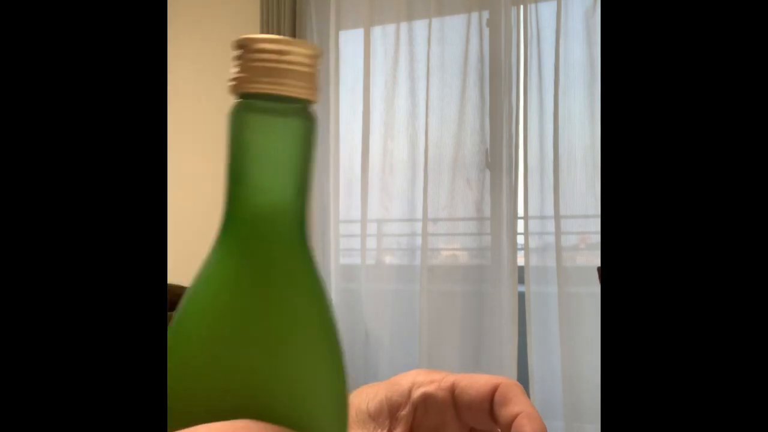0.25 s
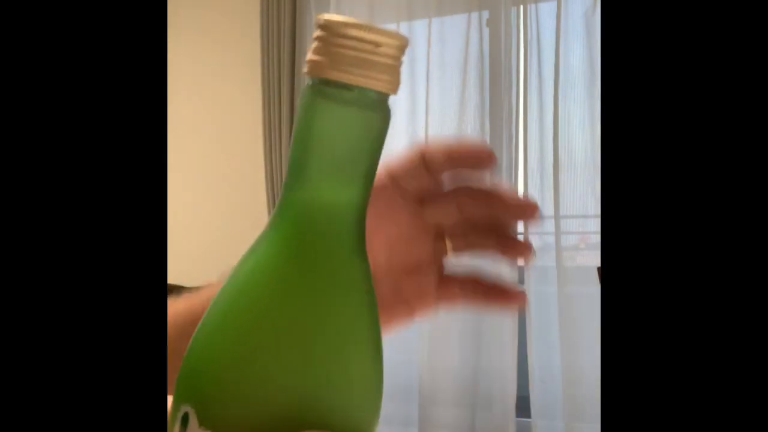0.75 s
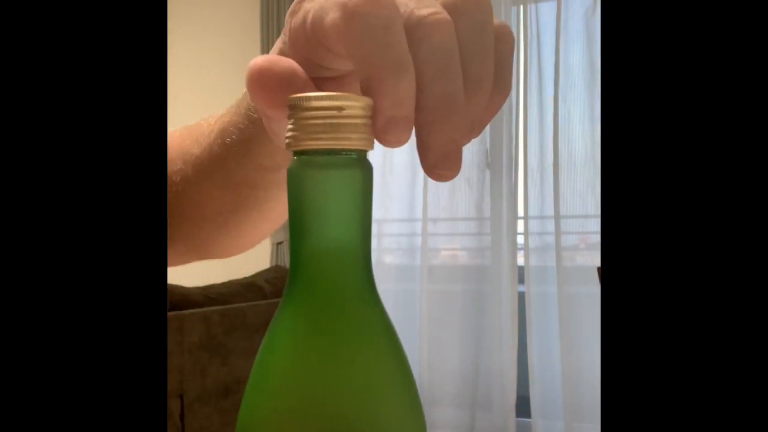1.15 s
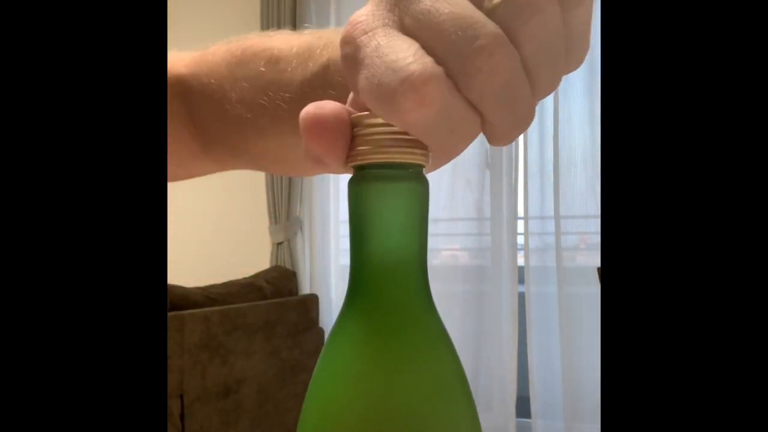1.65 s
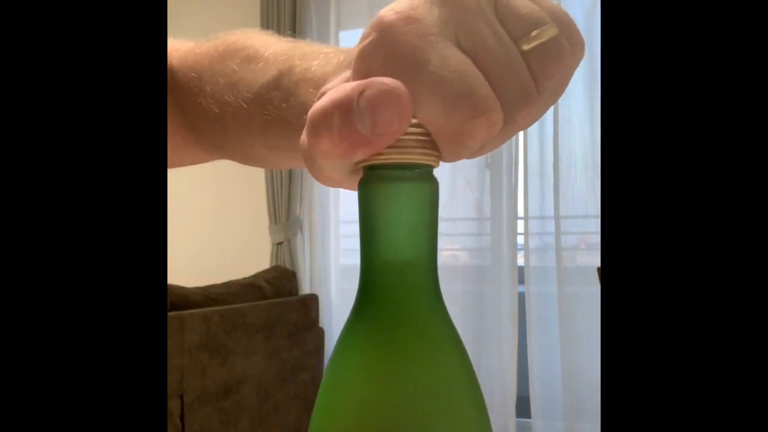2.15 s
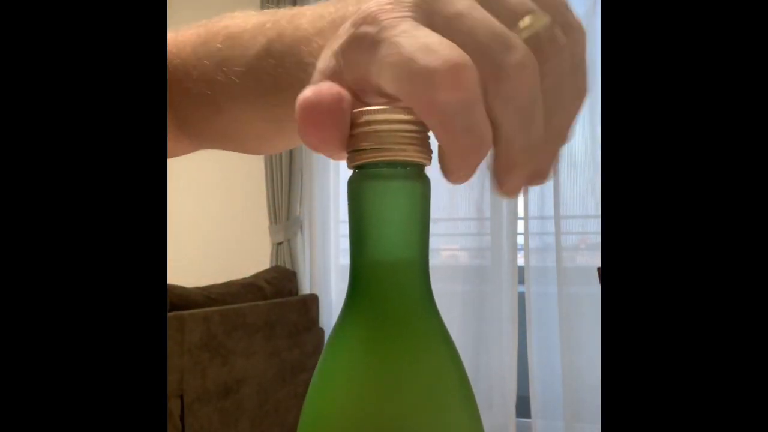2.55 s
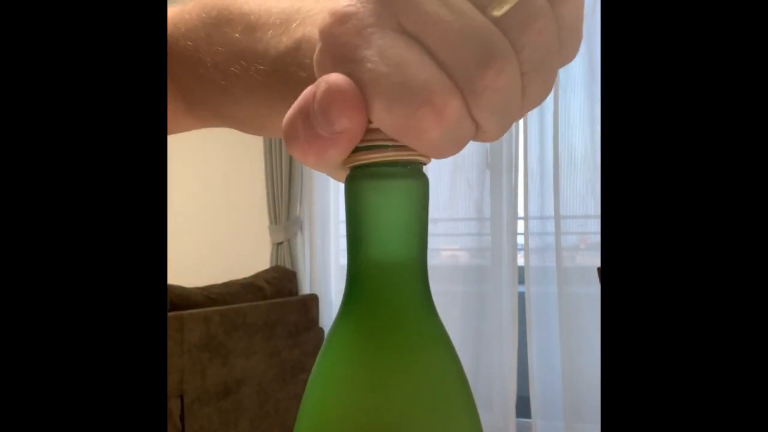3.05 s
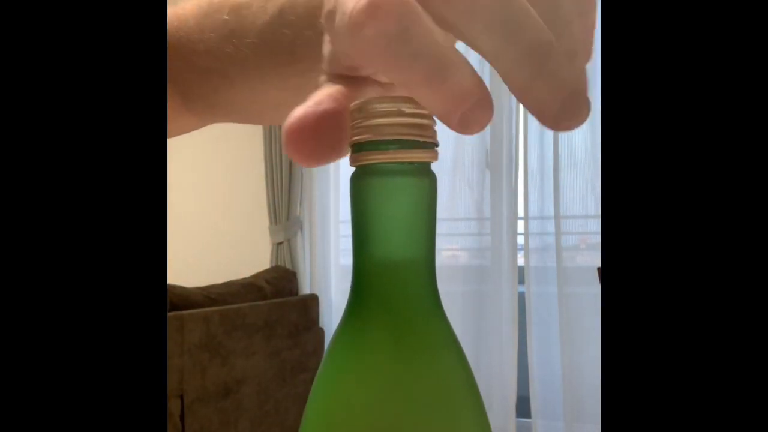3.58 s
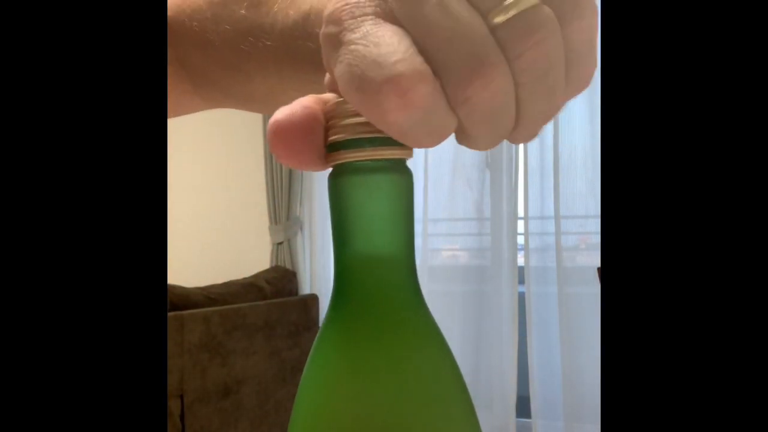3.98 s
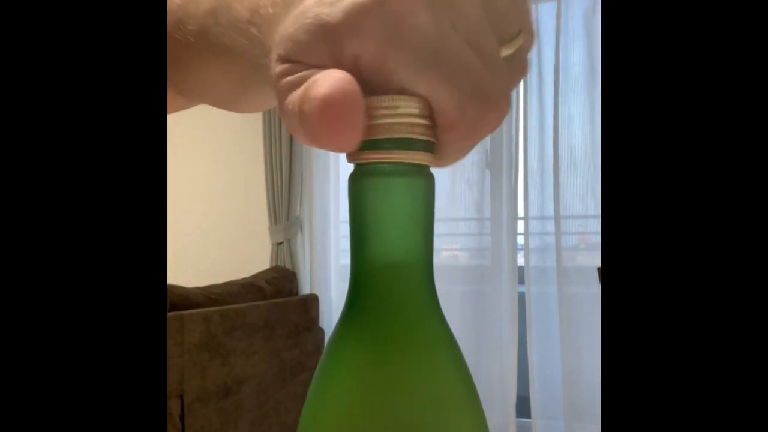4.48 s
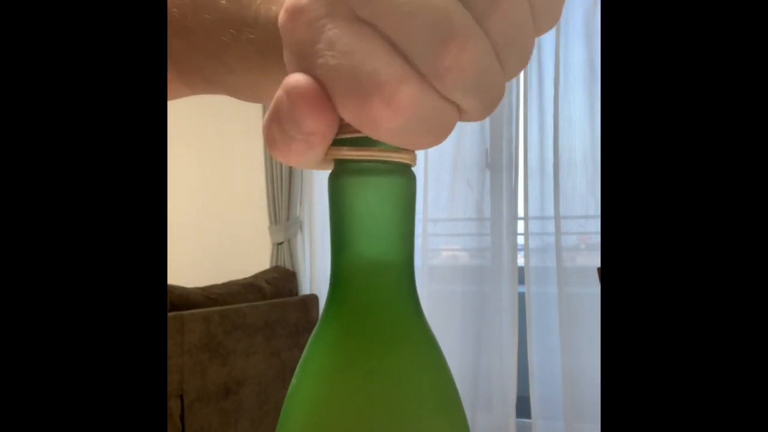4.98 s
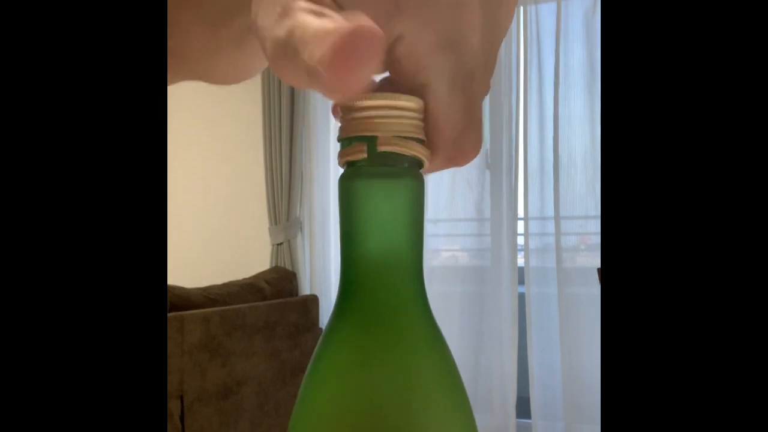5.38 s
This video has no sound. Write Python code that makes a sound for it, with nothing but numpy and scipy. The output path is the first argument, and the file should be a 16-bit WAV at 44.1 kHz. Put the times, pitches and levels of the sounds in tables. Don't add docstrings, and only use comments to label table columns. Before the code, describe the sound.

Close indoor bottle opening: bottle knocks on a table, cap seal cracks in bursts, threads rub and squeak, then the freed cap pings.

```python
import sys
import numpy as np
from scipy import signal
from scipy.fft import rfft, irfft, next_fast_len
from scipy.io import wavfile
from scipy.ndimage import uniform_filter1d

SR = 44100
rng = np.random.default_rng(int(sys.argv[2]) if len(sys.argv) > 2 else 0)


def decibels_to_gain(level_db):
    exponent = np.asarray(level_db, float) / 20
    return 10 ** exponent


def to_wav(s):
    ch = np.atleast_2d(s).T
    pcm = np.round(np.clip(ch, -1, 1) * 32767)
    wavfile.write(sys.argv[1], SR, pcm.astype(np.int16))


N = 247842
SIZE = next_fast_len(N)


def shape(x, points):
    hz, db = np.transpose(points)
    size = next_fast_len(x.shape[-1])
    f = np.fft.rfftfreq(size, 1 / SR) + 1
    gain = decibels_to_gain(np.interp(np.log(f), np.log(hz), db))
    return irfft(rfft(x, size) * gain, size)[..., :x.shape[-1]]


def bandpass(x, hz, width_hz):
    return signal.lfilter(*signal.iirpeak(min(hz, .4 * SR), hz / width_hz, fs=SR), x)


def log_interp(hz, points):
    point_hz, value = np.transpose(points)
    return np.interp(np.log(hz), np.log(point_hz), value)


def unit(x):
    return x / np.abs(x).max()


def add(out, s, x):
    i = int(s * SR)
    out[..., i:i + x.shape[-1]] += x[..., :N - i]


def walk(rate_hz):
    k = int(SR / rate_hz)
    steps = np.repeat(rng.standard_normal(N // k + 1), k)
    return 1.83 * uniform_filter1d(uniform_filter1d(steps, k), k)[:N]


# f/Hz, level/(dB per Hz)
AIR_HUM = [(13, -41.5), (22, -4.5), (53, -3.5), (82, -14.5), (204, -20), (233, -32), (306, -17.5),
           (393, -22), (505, -22.5), (605, -29.5), (975, -28), (1090, -34), (1680, -37), (2620, -42),
           (3000, -52), (6500, -74), (11000, -120)]


def air(hum_db=-50, linger_db=-41.5, linger_s=0.28, left_db=1.0, hiss_db=-81):
    noise = rng.standard_normal((5, N))
    low = shape(noise[0], [(80, -3.5), (130, -29.5)]) * decibels_to_gain(2.0 * walk(3.85))
    rest = shape(noise[1:3], [(70, -8), (120, 0)]) * decibels_to_gain(.8 * walk(8))
    hum = shape(low + rest, AIR_HUM)
    t = np.arange(N) / SR
    linger = 0
    for s, db, *_ in KNOCKS:
        linger = linger + decibels_to_gain(2 * (db + linger_db)) * (t > s) * np.exp(-np.abs(t - s) / linger_s)
    hum = hum / hum.std() * np.sqrt(decibels_to_gain(2 * hum_db) + linger)
    tilt = decibels_to_gain(np.array([[left_db], [-left_db]])) - 1
    hum += shape(hum, [(700, 7), (1500, -3)]) * tilt
    hiss_colour = [(1500, -6), (2600, 11.5), (3100, -7.5), (6000, 3), (11000, 0.5), (16000, -12.5)]
    return hum + decibels_to_gain(hiss_db) * shape(noise[3:], hiss_colour)


# f/Hz, t60/s
ROOM_DECAY = [(60, 0.61), (300, 0.44), (1500, 0.48), (4500, 0.38), (9000, 0.3), (16000, 0.27)]


def room(x, wet_db, first_s=0.0043):
    t = np.arange(SR // 2) / SR
    tail = 0
    for hz in 45 * 2 ** np.arange(0, 8.6, .5):
        band = bandpass(rng.standard_normal((2, len(t))), hz, hz / 3)
        tail = tail + band * decibels_to_gain(-60 * t / log_interp(hz, ROOM_DECAY))
    tail *= np.clip(t / first_s - .5, 0, 1)
    tail /= np.sqrt(np.sum(tail ** 2) / 2)
    return signal.fftconvolve(x, tail, axes=1)[:, :N] * decibels_to_gain(wet_db)


# t/s, 250-550 Hz peak level/dB, then relative to it bass/dB, upper body/dB, edge/dB
KNOCKS = [(0.05, -51, 2, -7.5, 0), (0.336, -16.5, -13.5, 0, -9), (0.463, -28, -6.5, 13, -1.5),
          (1.195, -5.5, -3, -3, -5), (1.411, -16.5, -6.5, -6.5, -4.5), (1.42, -5, -5.5, -1, -4),
          (1.504, -27.5, -15.5, 6.5, -1), (1.661, -22, -6.5, -8.5, -14.5), (1.805, -29.5, -8, -5, -13.5),
          (2.102, -20.5, -28.5, -6, -8), (2.215, -25, -2, -5.5, -19), (2.391, -28.5, -11.5, -11.5, -19),
          (2.709, -15.5, -13.5, -6.5, -12.5), (2.876, -21, -8.5, -7, -16), (3.004, -26, 0.5, -1, -3),
          (3.167, -23, -7.5, -4, -5.5), (3.802, -28, -5, -5.5, -11.5), (4.132, -25.5, -3.5, -7, -8.5),
          (4.302, -14, -6.5, 0, -9), (4.476, -32, -2, -23, -15.5), (4.855, -19.5, -6.5, -7, -15),
          (5.133, -19.5, 1.5, -10, -6.5), (5.278, -11.5, -9.5, -2.5, -8.5), (5.363, -8, -8, 0, 0)]
# t/s, first level/dB, change/(dB per bounce), bounces
CHATTERS = [
    (.53, -29.5, -1.77, 8),
    (.542, -28, -2, 1),
    (1.214, -17, -6.5, 2),
    (2.125, -34, 0.36, 8),
    (2.146, -34.5, 1, 1),
    (5.286, -19, 0, 1.028),
    (5.372, -10.5, -6, 1.8),
]
# bass/dB, upper body/dB, edge/dB
BOUNCE_COLOUR_DB = [-18.5, 0, -8]


def jolts(bounce_s=.0135, jitter=.2, scatter_db=5.5):
    rows = list(KNOCKS)
    for s, first_db, step_db, count in CHATTERS:
        k = np.arange(int(count))
        time_chance, level_chance = rng.standard_normal((int(count), 2)).T
        at = s + bounce_s * (k + jitter * time_chance * (k > 0))
        db = first_db + step_db * k + scatter_db * level_chance
        rows += [(a, d, *BOUNCE_COLOUR_DB) for a, d in zip(at, db)]
    return rows


# f/Hz, level/dB
EDGE_COLOUR = [(800, -20), (1290, 9), (1600, -2.5), (2300, -4), (3200, -13), (5000, -20.5), (8000, -28),
               (16000, -51.5)]


def knock_edge(t, peak_db, rise_s=.003, fade_s=0.0092, lag_s=0.00024, own=0.98, click_slope=0.45):
    shake = rng.standard_normal((3, len(t)))
    shared = np.array([shake[0], np.roll(shake[0], int(lag_s * SR))])
    edge = shape(shared + own * shake[1:], EDGE_COLOUR)
    edge = edge * (1 - np.exp(-(t / rise_s) ** 2)) * np.exp(-t / fade_s)
    dull = shape(edge, [(2500, 0.5), (5000, -15.0)])
    click = (edge - dull) * np.exp(-(t / 0.0078) ** 2)
    return unit(dull + decibels_to_gain(click_slope * peak_db) * click)


# f/Hz, level/dB, t60/s
WOOD_MODES = [(52, -29, 0.037), (79.3, -10.5, 0.13), (110.8, 3, 0.062), (151.4, -3.5, 0.093),
              (187.4, 0.5, 0.048), (225.3, -2, 0.063), (275, 0, 0.055), (353.2, -8, 0.092),
              (375.9, 0, 0.087), (402.3, -5.5, 0.085), (445, -6, 0.071), (511.5, 0.5, 0.059),
              (638.7, -3, 0.049), (716.2, 0.5, 0.065), (779.2, -5.5, 0.063), (858.8, -8, 0.079),
              (979, -12.5, 0.067), (1079.6, -10, 0.065)]
WOOD_EDGES_HZ = [250, 550]
# f/Hz, left lead/rad
TABLE_PHASE = [(50, .5), (200, 0.7), (340, 1.8), (780, 0.43), (1030, 2.5)]


def knocks(scatter_db=4.5, late=3.34, spread=0.025, damp_db=5, free_s=0.028, pan_db=2):
    out, t = np.zeros((2, N)), np.arange(SR // 8) / SR
    hz, db, t60 = np.repeat(np.transpose(WOOD_MODES), 2, axis=1)[:, :, None]
    group = np.searchsorted(WOOD_EDGES_HZ, hz[:, 0])
    rise = 1 - np.exp(-(t * np.sqrt(hz * 300) / late) ** 2)
    swell = rise * decibels_to_gain(-60 * t / t60) * (1 - t / t[-1])
    swell *= decibels_to_gain(-damp_db * np.clip((t - free_s) / 0.012, 0, 1))
    apart = log_interp(hz, TABLE_PHASE) / (2 * np.pi) * [[[1]], [[0]]]
    pan = np.array([[pan_db], [-pan_db]]) / 2
    for s, peak_db, bass_db, upper_db, edge_db in jolts():
        detune = 1 + spread * rng.standard_normal((len(hz), 1))
        size = decibels_to_gain(db + scatter_db * rng.standard_normal((len(hz), 1)))
        phase = rng.random((len(hz), 1)) + apart + 0.072 * rng.standard_normal((2, len(hz), 1))
        modes = size * swell * np.sin(2 * np.pi * (hz * detune * t + phase))
        body = decibels_to_gain(edge_db) * knock_edge(t, peak_db)
        for k, group_db in enumerate([bass_db, 0, upper_db]):
            body += decibels_to_gain(group_db) * unit(modes[:, group == k].sum(1))
        add(out, s - .0042, body * decibels_to_gain(peak_db + pan))
    return out


# t/s, level/dB, treble share/dB, lowest mode share/dB
TICKS = [
    (1.505, -44, -11, -9),
    (2.097, -60, 11, 14),
    (2.135, -62, -1, 8),
    (2.159, -62, -10, 12),
]
# f/Hz, level/dB, t60/s
RING_MODES = [(3610, 0, .055), (4800, -24, .08), (5500, 0, .2), (8350, -14, .07), (13620, -9, .15),
              (14830, -23, .15)]


def ticks(beat=0.45, split=0.006, scuff_db=3.0):
    out, t = np.zeros(N), np.arange(SR // 3) / SR
    for s, level_db, treble_db, low_db in TICKS:
        for hz, db, t60 in RING_MODES:
            share_db = treble_db * (hz > 8000) + low_db * (hz < 4000)
            fade = decibels_to_gain(level_db + db + share_db - 60 * t / t60)
            beating = 1 + beat * np.sin(2 * np.pi * hz * split * t)
            add(out, s, fade * beating * np.sin(2 * np.pi * hz * t))
        scuff = shape(rng.standard_normal(len(t)), [(2000, -7), (5000, 5.0), (7000, -3), (10000, -29.5)])
        add(out, s, decibels_to_gain(level_db + scuff_db) * scuff * np.exp(-t / 0.015))
    return out


def stroke(swell_s, fade_s, patchy_db=1.5):
    reach = 1.3
    t = np.arange(-int(reach * swell_s * SR), int(reach * fade_s * SR)) / SR
    arc_db = -20 * (t / np.where(t < 0, swell_s, fade_s)) ** 2
    return decibels_to_gain(arc_db + patchy_db * walk(60)[:len(t)]), reach * swell_s


def slips(n, grain_db=1.5):
    return rng.standard_normal(n) * decibels_to_gain(grain_db * rng.exponential(size=n))


# loudest t/s, swell/s, fade/s, level/dB, brightest band f/Hz
SLIDES = [(.27, 0.2, 0.16, -88, 12500), (.72, 0.039, 0.022, -81, 11600), (.96, .1, .1, -84.5, 11400),
          (2.568, .03, 0.043, -96, 14500), (2.824, 0.026, .035, -85.5, 14200),
          (3.445, 0.029, 0.046, -69, 14700), (4.05, .05, 0.12, -75.5, 14100),
          (4.23, 0.14, 0.097, -68.5, 13600), (4.53, 0.066, 0.099, -67, 14600),
          (4.75, 0.14, .15, -88, 13000), (4.9, 0.012, 0.04, -64.5, 13000), (5.08, 0.09, 0.12, -58.5, 13900)]


def slides(cup_s=0.0015, cup_db=-6, width_hz=2600, wide_db=-7):
    out = np.zeros(N)
    delay = int(cup_s * SR)
    for s, swell_s, fade_s, db, hz in SLIDES:
        size, lead_s = stroke(swell_s, fade_s)
        x = slips(len(size))
        x[delay:] += decibels_to_gain(cup_db) * x[:-delay]
        wide = bandpass(bandpass(x, 8600.0, 5600.0), 9100.0, 6600.0)
        treble = bandpass(bandpass(x, hz, width_hz), hz, width_hz)
        rub = treble / treble.std() + decibels_to_gain(wide_db) * wide / wide.std()
        add(out, s - lead_s, rub * size * decibels_to_gain(db))
    return out


# loudest t/s, swell/s, fade/s, level/dB
SCRAPES = [
    (.22, 0.096, 0.35, -74),
    (.57, 0.086, 0.047, -77),
    (2.19, 0.017, 0.012, -48.5),
    (2.59, .1, .05, -82),
    (2.93, .04, .01, -62),
    (4.2, .16, 0.17, -68.5),
    (4.499, 0.035, 0.084, -70),
    (4.74, 0.24, 0.14, -67),
    (4.902, .015, 0.12, -52.5),
    (5.091, 0.17, 0.15, -61),
]


def scrapes():
    out = np.zeros(N)
    for s, swell_s, fade_s, db in SCRAPES:
        size, lead_s = stroke(swell_s, fade_s)
        lower = bandpass(bandpass(slips(len(size)), 3100.0, 4500.0), 2600.0, 7000.)
        add(out, s - lead_s, lower / lower.std() * size * decibels_to_gain(db))
    return out


# start t/s, length/s, f/Hz, width/Hz, level/dB
SINGS = [(4.16, .13, 10300, 900, -68), (4.16, .13, 6700, 900, -74.5), (4.81, .05, 7600, 400, -73),
         (4.17, .11, 12000, 800, -72), (4.885, .07, 2600, 260, -54), (4.885, .056, 3950, 300, -50),
         (5.02, .09, 9600, 1500, -58), (5.02, .09, 6800, 900, -68), (.88, .18, 11400, 700, -84),
         (5.342, .043, 3500, 430, -43), (5.344, .025, 1200, 620, -37), (1.18, .017, 1200, 1200, -43.5),
         (3.003, .025, 2300, 3000, -43), (3.005, .13, 2330, 300, -55)]
# start t/s, length/s, level/dB
SQUEAKS = [
    (2.47, .13, -74),
    (2.77, .09, -80),
    (3.88, .11, -78),
    (4.53, .09, -69),
]


def sings(liner_hz=4470, liner_width_hz=90):
    out = np.zeros(N)
    squeaks = [(s, length_s, liner_hz, liner_width_hz, db) for s, length_s, db in SQUEAKS]
    for s, length_s, hz, width_hz, db in SINGS + squeaks:
        noise = rng.standard_normal(int(length_s * SR))
        line = bandpass(bandpass(noise, hz, width_hz), hz, 2 * width_hz)
        add(out, s, decibels_to_gain(db) * line / line.std() * np.hanning(len(line)) ** .5)
    return out


# f/Hz, level/dB, t60/s
CAP_MODES = [(3398, -1.5, 0.4), (3440, 5.5, 0.3), (4650, -10, 0.32), (5470, -16, .35), (6740, -14, 0.3)]
# t/s, level/dB
CAP_FREE = (5.366, -36)


def cap_ring():
    out, t = np.zeros(N), np.arange(SR // 3) / SR
    free_s, level_db = CAP_FREE
    for hz, db, t60 in CAP_MODES:
        rough = bandpass(rng.standard_normal(len(t)), hz, 25.)
        add(out, free_s, decibels_to_gain(level_db + db - 60 * t / t60) * rough / rough.std())
    return out


# t/s, level/dB, crack f/Hz, cap ring above the crack/dB, ring f/Hz
SNAPS = [(2.199, -0.5, 13100, -11.5, 3660), (2.206, -9, 12380, -5, 3430), (2.2143, -2.5, 12920, -9, 3770),
         (2.2269, -10, 11900, -1.3, 3807), (2.2488, -3, 12400, -12.5, 4200), (2.5, -53, 10480, 4, 4440),
         (2.9242, -42.5, 8000, 3, 2790), (2.9426, -17, 12400, -24, 3500), (3.0, -0.5, 13640, -30, 4780),
         (3.0046, -10, 11760, -5.5, 4550), (3.1645, -1.5, 10200, -19, 4650),
         (3.308, -46.5, 7940, -0.5, 4480), (5.1258, -4.5, 12400, -13.5, 4150),
         (5.3616, -33.5, 7600, 19.5, 2100), (5.371, -8, 12800, -6, 3220), (5.3725, -5.5, 13100, -23, 3520)]
# f/Hz, level/dB
SPRAY_COLOUR = [(1400, -21.5), (2050, -10), (2300, 4.5), (2600, -10), (4200, -2), (4600, 11.5), (5000, -2),
                (6500, -3), (8500, 7), (16000, 1)]


def snaps(crack_s=0.000084, echo_s=.00045, echo_db=-3, ring_s=0.00089, ring_width_hz=800,
          crack_db=1.5, spray_db=3):
    out, t = np.zeros((2, N)), np.arange(SR // 40) / SR
    steep = [(2500, -26), (6000, -22.5), (7800, 7.5), (22000, -5)]
    wide = decibels_to_gain(spray_db) * shape(1. * (t == t[9]), SPRAY_COLOUR)
    for s, peak_db, crack_hz, ring_db, ring_hz in SNAPS:
        burst = rng.standard_normal(len(t)) * t * np.exp(-t / crack_s)
        crack = unit(shape(bandpass(burst, crack_hz, 7500.0), steep))
        crack = unit(crack + decibels_to_gain(echo_db) * np.roll(crack, int(echo_s * SR)))
        shake = rng.standard_normal(len(t)) * t * np.exp(-t / ring_s)
        octave_below = bandpass(shake, ring_hz / 2, 300.0)
        ring = decibels_to_gain(ring_db) * unit(bandpass(shake, ring_hz, ring_width_hz) + 0.19 * octave_below)
        add(out, s - .00015, decibels_to_gain(peak_db) * np.array([decibels_to_gain(crack_db) * crack + ring, wide + ring]))
    return out


# f/Hz, right lag/rad
PORT_LAG = [(0, 0), (4000, 1.5), (7500, 2.1), (9300, 3.14), (12500, 5.3), (16000, 7.2), (22050, 10)]


def lag(x):
    turn = np.interp(np.fft.rfftfreq(SIZE, 1 / SR), *np.transpose(PORT_LAG))
    return np.array([x, irfft(rfft(x, SIZE) * np.exp(-1j * turn), SIZE)[:N]])


def scene():
    table, (crack, spread) = knocks(), snaps()
    hand = lag(ticks() + slides() + scrapes() + sings() + cap_ring())
    wall_colour = [(70, -14), (350, 2), (730, -4.5), (1400, -1.0), (5000, -1.5), (9000, -9.5)]
    to_walls = decibels_to_gain(-8.5) * shape(table, wall_colour) + decibels_to_gain(-8.5) * spread + decibels_to_gain(-9.5) * hand
    return table + lag(crack) + hand + room(to_walls, 0) + air()


def top_cut(x):
    return signal.sosfilt(signal.butter(12, 17840, fs=SR, output="sos"), x)


def record(dry, split_hz=5200):
    shared = np.clip(np.fft.rfftfreq(SIZE, 1 / SR) / split_hz * 4 - 3.5, 0, 1)
    late_left = lag(dry[0])[1]
    right = irfft(rfft(dry[1], SIZE) * (1 - shared) + rfft(late_left, SIZE) * shared, SIZE)[:N]
    rounded = np.tanh(0.66 * np.array([dry[0], right])) / 0.71
    both = shape(rounded, [(25, -16.0), (55, 1), (15700, 0.0), (16300, -13), (17000, -19.5), (17600, -73.5)])
    return top_cut(both)


dry = scene()
out = record(dry)
to_wav(out)
```